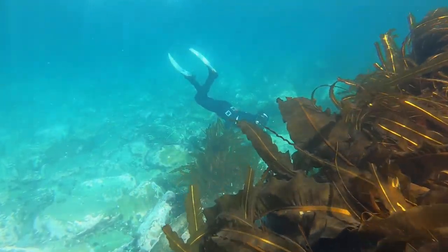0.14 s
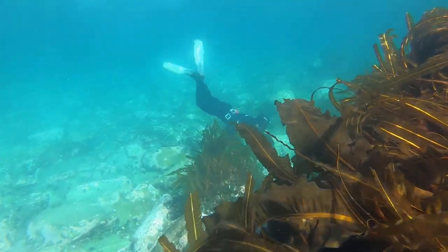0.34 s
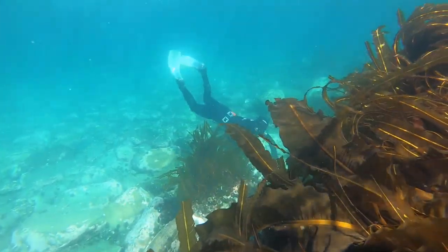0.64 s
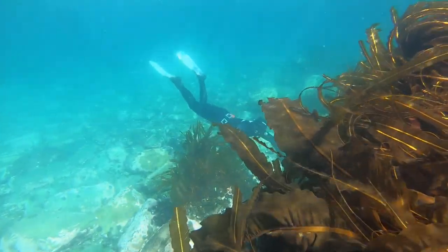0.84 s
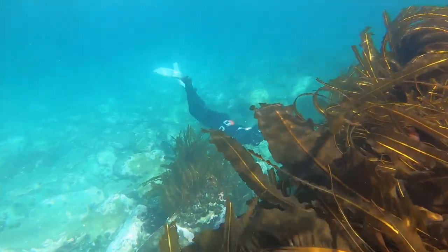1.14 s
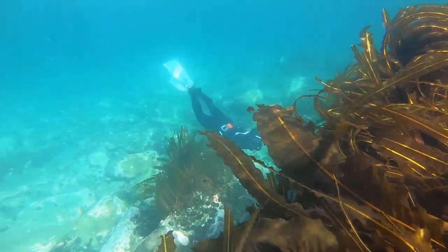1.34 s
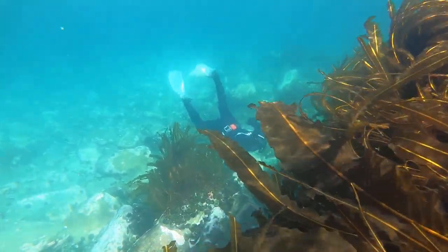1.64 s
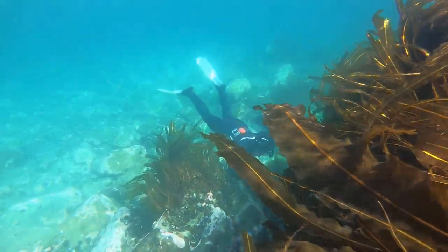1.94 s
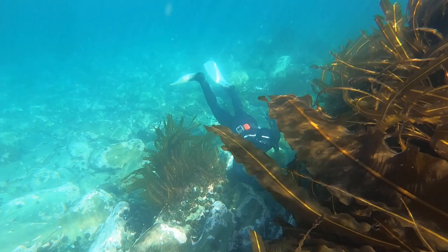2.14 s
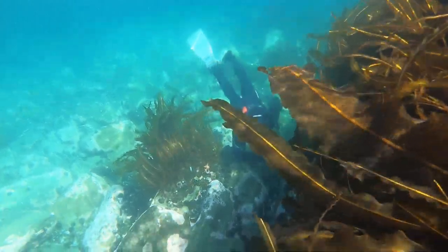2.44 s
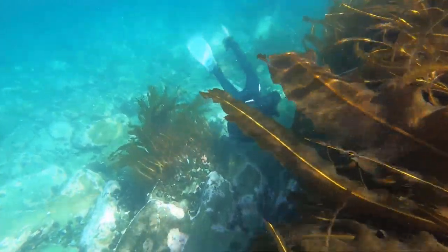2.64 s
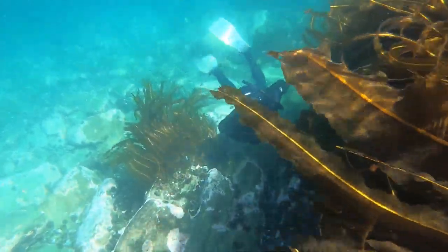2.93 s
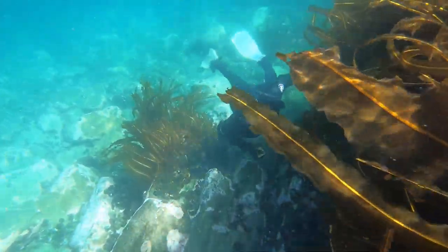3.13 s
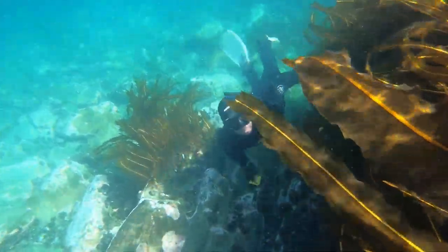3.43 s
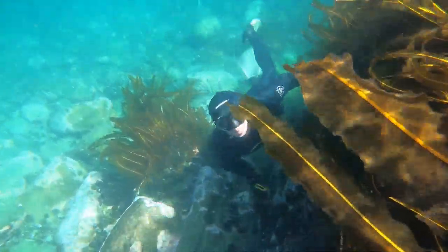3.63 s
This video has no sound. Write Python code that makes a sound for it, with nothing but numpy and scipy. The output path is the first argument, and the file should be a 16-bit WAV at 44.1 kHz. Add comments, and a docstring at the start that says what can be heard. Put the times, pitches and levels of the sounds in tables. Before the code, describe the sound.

Muffled underwater gurgling, heard close through a camera's sealed housing. A quiet rumble, hum and faint hiss open; from 0.2 s hollow bubble blips, thumps and gurgles cluster until about 0.6 s. It thins around 1 s, stirs again at 1.3 s, and a dull slosh with plops comes at 2.1 s. After a sparser stretch near 2.7 s, blips thicken from 3 s, busiest at 3.6 s to the end; tiny ticks throughout.

```python
"""First comes a quiet rumble and hum with a faint far hiss and gurgle; thumps and bright blips soon follow.
We are with a camera in a waterproof housing, under water near rocks. Surges push on it as low waves.
Sloshes are bursts of shaped noise, and the gurgle is many random bubble grains over a wash of noise.
Blips and held notes are single tones, placed by the housing's cavities; blips, gurgle and sloshes also
ring those cavities. Ticks are short high cycles, and rumble, hum and hiss are filtered noise."""
import sys
import numpy as np
from scipy import signal
from scipy.fft import rfft, irfft, next_fast_len
from scipy.io import wavfile
from scipy.ndimage import map_coordinates

SR = 44100
rng = np.random.default_rng(int(sys.argv[2]) if len(sys.argv) > 2 else 0)


def store_pcm(level_fs):
    """Save levels as 16-bit WAV."""
    pcm = np.round(np.clip(level_fs, -1, 1) * 32767).astype(np.int16)
    wavfile.write(sys.argv[1], SR, np.atleast_2d(pcm).T)


def decibels_to_gain(level_db):
    """Convert a level in decibels to a linear amplitude gain (20 dB per decade)."""
    exponent = np.asarray(level_db, float) / 20
    return 10 ** exponent


N = 166698  # length in samples

# Far hiss, relative colour: [f/Hz, level/dB]
SEA_COLOUR = [(120, -14), (200, 0.5), (350, -13.5), (556, -21), (1100, -18.5), (2000, -18.5), (3700, -28),
              (5200, -23), (7300, -21), (8800, -35.5), (10500, -39.5), (12500, -41.5), (14500, -47),
              (16000, -91)]
# Slow swell of the hiss below the split: [t/s, level/dB over the steady hiss]
SEA_SWELL = [(0, 0), (.7, 0.5), (1.35, 3), (1.7, -0.5), (2.8, -0.5), (3.78, -0.5)]
SEA_DB, SEA_SPLIT_HZ = -64, 9700
HUM_HZ, HUM_WIDTH_HZ, HUM_DB = 173.6, 40.5, -58  # width is for one pass of the resonance
HUM_ALIKE = 0.76  # how alike the sides are, with one turned upside down
# Rumble under the surges, relative colour: [f/Hz, level/dB]
RUMBLE_COLOUR = [(8.8, -34), (18, 1.5), (33, 1), (52, -2), (67, -6.5), (103, -28), (130, -16.5), (170, -64),
                 (290, -120)]
RUMBLE_DB, RUMBLE_SWING_DB = -58, 1
# Cavities of the housing: [f/Hz, width of one pass/Hz, right level/dB, left minus right/dB, left lead/rad]
CAVITIES = [(338, 273, -16.5, -4, 4), (530, 117, -11, -9.5, 4), (720, 134, -2.5, -8.5, 4),
            (890, 185, -20.5, 5.5, 4), (1166, 40, -6.5, -3.5, 3.5), (1320, 124, -11, 5, 2.25),
            (1564, 146, -6.5, -9.5, -2.5), (1765, 91, -18.5, 0.5, 5.5), (1970, 202, -14, -2, 1),
            (2444, 204, -25.5, 2, 1.56), (2662, 387, -23, -5.5, -2.5), (3160, 160, -37.5, 3.5, -2.5),
            (3865, 1180, -39, -6.5, 1.6), (5170, 680, -39.5, 3, -0.1), (6136, 470, -32, -7.5, 0.9),
            (6970, 1560, -41.5, 1, 1.3)]
# Tiny bubbles: [start t/s, relative level/dB, f/Hz]
TICKS = [(0.2259, -48, 5840), (0.2365, -50, 7200), (0.2696, -52.5, 7170), (0.5574, -51, 5740),
         (0.7413, -49, 5760), (0.7836, -51, 7300), (1.169, -50.5, 5720), (1.3581, -46.5, 6000),
         (1.847, -51, 7600), (2.0802, -56.5, 5100), (2.358, -49, 7100), (2.578, -54, 5280),
         (2.656, -59, 5300), (2.8365, -47, 5030), (2.862, -60, 5000), (3.2088, -55.5, 5170),
         (3.225, -50.5, 5600), (3.431, -52.5, 5290), (3.588, -45.5, 5070), (3.607, -50, 5150),
         (3.745, -56.5, 5170)]
TICK_S, TICK_TOP_HZ = 0.0029, 7200  # fade time, and where the muffling sets in
# Pushes of water: [crest t/s, relative level/dB, f/Hz, length/s]
SURGES = [(0.084, -44.5, 37, 0.045), (0.154, -43.5, 44, 0.033), (0.312, -33, 46, 0.031),
          (0.359, -42.5, 90, 0.024), (0.445, -39.5, 41.3, 0.057), (0.511, -48, 42.5, 0.035),
          (1.114, -47.5, 55, 0.025), (1.248, -44, 112, 0.0084), (1.298, -36, 42, 0.03),
          (1.358, -42.5, 35, 0.013), (1.652, -43, 35.6, 0.014), (1.723, -40.5, 48, 0.057),
          (1.866, -44, 36.3, 0.059), (1.993, -39, 29, 0.042), (2.07, -42.5, 47, 0.024),
          (2.132, -43.5, 34.7, 0.054), (2.241, -47, 34, 0.036), (2.314, -40.5, 34, 0.035),
          (2.497, -43, 52.6, 0.04), (2.604, -47, 34, 0.017), (3.066, -52, 29, 0.068),
          (3.279, -47.5, 38, 0.056), (3.417, -38, 43.3, 0.033), (3.525, -43.5, 64, 0.018),
          (3.704, -45.5, 35, 0.049)]
SURGE_PAN_DB, SURGE_LEAD_RAD = -5.5, -0.48  # left compared with right
SURGE_SLAP_DB = -8  # higher tone compared with the push
# Water against the housing: [start t/s, dull body level/dB, bright crunch level/dB, length/s]
SLOSHES = [(0.223, -68, -37, 0.0015), (0.253, -56, -54.5, 0.068), (0.444, -42, -58.5, 0.05),
           (0.536, -89, -56.5, 0.087), (1.241, -61, -60, 0.026), (1.287, -41.5, -58, 0.04),
           (1.496, -57, -76, 0.13), (1.716, -73, -53, 0.016), (2.07, -38.5, -47.5, 0.04),
           (2.142, -54, -59.5, 0.073), (2.364, -58, -52.5, 0.0024), (2.544, -48, -69, 0.043),
           (3.139, -47, -79, 0.067), (3.353, -63, -50.5, 0.018), (3.431, -46.5, -78, 0.06),
           (3.582, -67, -52, 0.0032), (3.628, -48.5, -84, 0.046), (3.719, -66, -53.5, 0.051)]
# Relative colours of the dull body and the bright crunch: [f/Hz, level/dB]
SLOSH_BODY = [(40, -38), (70, -11), (130, -2), (250, -6.5), (450, -11), (700, -18.5), (1200, -69)]
SLOSH_CRUNCH = [(300, -46), (900, -20), (2500, 0.5), (4000, 5.5), (6000, -0.5), (8000, -1.5), (10000, -31)]
# Trapped bubbles that sing on: [start t/s, relative level/dB, first f/Hz, last f/Hz, length/s]
HELD = [(0.445, -33.5, 722, 735, 0.053), (1.505, -42.5, 721, 720, 0.049), (2.241, -44.5, 629, 747, 0.06),
        (2.243, -48.5, 1398, 1320, 0.077)]
# Single blips: [t of the snap/s, relative level/dB, f/Hz, length/s]
BUBBLES = [(0.24, -45, 1620, 0.0053), (0.2278, -31.5, 721, 0.017), (0.238, -28.5, 1573, 0.009),
           (0.2387, -24, 723.6, 0.013), (0.277, -37, 1584, 0.013), (0.302, -34.5, 720.0, 0.01),
           (0.345, -41, 1956, 0.0072), (0.417, -38.5, 730.6, 0.056), (0.421, -39, 1604, 0.011),
           (0.44, -40, 1400, 0.01), (0.549, -38.5, 1615, 0.026), (0.552, -36.5, 720.0, 0.022),
           (0.566, -35, 1510, 0.0083), (0.714, -41.5, 1612, 0.029), (0.734, -49.5, 1786, 0.013),
           (0.776, -45, 1274, 0.019), (0.776, -48.5, 2410, 0.0059), (0.854, -45, 1690, 0.01),
           (0.871, -49, 1250, 0.0066), (0.863, -47.5, 741, 0.017), (1.085, -44, 806, 0.021),
           (1.133, -42.5, 1953, 0.021), (1.142, -41, 500, 0.011), (1.3, -28, 770, 0.0077),
           (1.316, -35.5, 1347, 0.011), (1.436, -37.5, 1623, 0.028), (1.472, -37.5, 1494, 0.018),
           (1.558, -48, 1995, 0.011), (1.57, -37.5, 501, 0.016), (1.625, -46.5, 500, 0.025),
           (1.688, -41, 1400, 0.026), (1.719, -33.5, 1560, 0.0068), (1.984, -43, 3420, 0.0037),
           (1.985, -42.5, 1320, 0.015), (2.049, -37, 703, 0.036), (2.077, -38, 1572, 0.014),
           (2.08, -33.5, 1362, 0.0077), (2.079, -25.5, 775, 0.012), (2.08, -44, 2630, 0.016),
           (2.088, -35, 530.0, 0.045), (2.117, -31, 553, 0.0036), (2.12, -27, 693, 0.012),
           (2.142, -27, 716, 0.02), (2.241, -29.5, 710, 0.0042), (2.282, -47, 760, 0.01),
           (2.328, -42, 1353, 0.019), (2.358, -29.5, 1705, 0.0052), (2.375, -49.5, 1230, 0.011),
           (2.424, -45, 2367, 0.004), (2.478, -45, 2090, 0.0057), (2.656, -39.5, 2200, 0.0034),
           (2.674, -49, 2390, 0.0039), (2.683, -54.5, 3530, 0.0062), (2.712, -54.5, 2460, 0.0099),
           (2.789, -53, 2750, 0.005), (2.829, -49.5, 893, 0.0078), (2.857, -34.5, 2576, 0.0075),
           (2.854, -51.5, 964, 0.02), (2.976, -32, 786, 0.009), (3.04, -31, 724, 0.0065),
           (3.087, -29, 730, 0.0035), (3.098, -37, 720.0, 0.0036), (3.162, -33.5, 697, 0.021),
           (3.165, -41, 1116, 0.025), (3.188, -30, 668, 0.01), (3.2, -45, 524, 0.028),
           (3.235, -42, 2480, 0.0043), (3.275, -36, 694, 0.0048), (3.308, -40.0, 660, 0.016),
           (3.36, -35, 767, 0.0081), (3.363, -32.5, 1327, 0.019), (3.365, -28.5, 1500.0, 0.0083),
           (3.39, -37, 1297, 0.016), (3.394, -44, 1583, 0.058), (3.414, -38.5, 683, 0.024),
           (3.446, -33, 707, 0.017), (3.484, -38.5, 1670, 0.01), (3.504, -33, 746, 0.0099),
           (3.508, -32.5, 1123, 0.0057), (3.591, -27, 1274, 0.019), (3.622, -32.5, 784, 0.0072),
           (3.623, -26, 1124, 0.018), (3.626, -43.5, 1866, 0.022), (3.701, -41, 1240, 0.008),
           (3.729, -50.5, 3230, 0.0048), (3.743, -32, 1986, 0.011), (3.744, -28.5, 1165, 0.0063),
           (3.745, -25, 1332, 0.013)]
BUBBLE_RISE, BUBBLE_ROUGH = 0.023, 0.26  # pitch climbs half this share per length; unsteadiness
BUBBLE_SNAP_DB = 12  # blow on the housing, over the blip's table level
# Strength of the gurgle, before its overall lift: [t/s, level/dB]
GURGLE = [(0, -62), (0.21, -64.5), (.23, -53.5), (.33, -54.5), (.39, -56), (0.451, -49.5), (.53, -51.5),
          (.58, -48), (.65, -72), (0.719, -58), (.8, -53), (.84, -69), (.87, -59), (.92, -64.5),
          (1.06, -59.5), (1.22, -57), (1.3, -50), (1.4, -53.5), (1.539, -52.5), (1.6, -63), (1.72, -55),
          (1.8, -58.5), (2.029, -68), (2.08, -48), (2.2, -60), (2.36, -61.5), (2.45, -60), (2.6, -57.5),
          (2.73, -62), (2.77, -73), (2.95, -73.5), (2.978, -58), (3.17, -53.5), (3.37, -53.5), (3.52, -54),
          (3.57, -64.5), (3.602, -48.5), (3.67, -62.5), (3.74, -52), (3.78, -46.5)]
# Weight of the large, deep bubbles: [t/s, gain below the split/dB]
DEEP = [(0, -0.5), (.45, -8.5), (.75, -17), (1.1, -6), (1.38, -12), (1.52, 5), (1.75, -12.5), (2.05, 6.5),
        (2.3, 5), (2.42, -9.5), (2.9, 7), (3.05, -1), (3.5, 1), (3.62, -5), (3.78, 1)]
# Lowest and highest bubble pitch in the gurgle: [f/Hz, f/Hz]
GURGLE_RANGE = (350, 8500)
GURGLE_DB, GURGLE_PER_S, GURGLE_SPREAD_DB, GURGLE_CYCLES = 4.5, 800, 3, 8.9
WASH_DB, DEEP_HZ = -1.5, 1090  # wash compared with the bubbles; deep split


def unit(x):
    """Scale to an rms of 1."""
    return x / np.sqrt(np.mean(x ** 2) + 1e-20)


def wobble(rate):
    """Draw a smooth random curve with this many knots a second."""
    return map_coordinates(rng.standard_normal(int(N * rate / SR) + 4), [np.arange(N) * rate / SR])


def over_time(points):
    """Join [t/s, level/dB] points by straight lines."""
    return np.interp(np.arange(N) / SR, *np.transpose(points))


def filtered(x, response):
    """Multiply the spectrum of x by a response that depends on frequency."""
    m = next_fast_len(N + SR // 2)  # spare room lets the ringing die
    return irfft(rfft(x, m) * response(np.fft.rfftfreq(m, 1 / SR)), m)[..., :N]


def colour(points):
    """Turn [f/Hz, level/dB] points into a gain for every frequency."""
    f, v = np.transpose(points)
    return lambda hz: decibels_to_gain(np.interp(np.log(hz + 1), np.log(f + 1), v))


def peak(f, hz, width_hz):
    """Response of one resonance, which rings only after it is struck."""
    return 1j * f * width_hz / (hz * hz - f * f + 1j * f * width_hz)


def housing(f):
    """Left and right response of the cavities: a sum of resonances, each passed twice."""
    total = 0
    for hz, width_hz, db, pan_db, lead in CAVITIES:
        left_and_right = np.array([[decibels_to_gain(pan_db) * np.exp(1j * lead)], [1]])
        total = total + decibels_to_gain(db) * peak(f, hz, width_hz) ** 2 * left_and_right
    return total


def sides(x, gains):
    """Give a complex signal its level and phase on each side."""
    return np.real(np.reshape(gains, (2, 1)) * x)


def placed(hz):
    """Side gains of the cavities at one pitch, the louder side set to 1."""
    gains = housing(np.array([hz]))
    return gains / abs(gains).max()


def surge_gains():
    """Level and phase of a push on each side: the left is softer and later."""
    return [decibels_to_gain(SURGE_PAN_DB / 2) * np.exp(1j * SURGE_LEAD_RAD), decibels_to_gain(-SURGE_PAN_DB / 2)]


def add(out, s, x):
    """Mix x in at s seconds, or at the very start if s is negative."""
    k = max(round(s * SR), 0)
    out[:, k:k + x.shape[1]] += x


def sea():
    """Far hiss: separate noise on each side; its lower part swells, the top stays steady."""
    hiss = unit(filtered(rng.standard_normal((2, N)), colour(SEA_COLOUR))) * decibels_to_gain(SEA_DB)
    fizz = filtered(hiss, lambda f: 1 / (1 + (f / SEA_SPLIT_HZ) ** 16))
    swell = decibels_to_gain(over_time(SEA_SWELL) + 1.02 * wobble(8.55))
    return hiss + fizz * (swell - 1)


def hum():
    """Far water: a narrow low band of noise that mostly pushes one side while it pulls the other."""
    opposed, shared = filtered(rng.standard_normal((2, N)), lambda f: peak(f, HUM_HZ, HUM_WIDTH_HZ) ** 2)
    turn = np.arccos(np.clip(HUM_ALIKE, 0, 1)) / 2
    shared, opposed = np.sin(turn) * shared, np.cos(turn) * opposed
    return unit(np.array([shared + opposed, shared - opposed])) * decibels_to_gain(HUM_DB + 1.63 * wobble(3.1))


def rumble():
    """Swaying low noise, leaning to one side as the surges do, with a little opposite noise."""
    noise = unit(filtered(rng.standard_normal((2, N)), colour(RUMBLE_COLOUR)))
    bed, loose = noise * decibels_to_gain(RUMBLE_DB + RUMBLE_SWING_DB * wobble(12))
    return sides(signal.hilbert(bed), surge_gains()) + 0.13 * loose * [[1], [-1]]


def ticks():
    """Tiny bubbles: a few high cycles with a crackle, muffled by the housing wall."""
    out, t = np.zeros((2, N + SR)), np.arange(900) / SR
    shape = np.exp(-t / TICK_S) * (1 - np.exp(-t / 0.00055))
    for s, db, hz in TICKS:
        ring = sides(np.exp(2j * np.pi * hz * t), [np.exp(.7j), 1])
        crackle = 2.3 * rng.standard_normal((2, 900)) * np.exp(-t / 0.0021)
        add(out, s, decibels_to_gain(db + 3.5) * (ring + crackle) * shape)
    # the second factor takes away the lows
    return filtered(out[:, :N], lambda f: 1 / (1 + (f / TICK_TOP_HZ) ** 12) / (1 + (4200 / (f + 1)) ** 8))


def surges():
    """Low pushes: short bell-shaped waves, each with a higher slap that opposes the two sides."""
    out = np.zeros((2, N + SR))
    for (s, db, hz, length), u in zip(SURGES, rng.random((len(SURGES), 3))):
        half = int(2 * length * SR)
        t = np.arange(-half, half) / SR
        bell = decibels_to_gain(db) * np.exp(-2.6 * (t / length) ** 2)
        push = np.exp(2j * np.pi * (hz * t + u[0]))
        slap_hz = (1.8 + 1.5 * u[1]) * hz
        slap = decibels_to_gain(SURGE_SLAP_DB) * np.exp(2j * np.pi * (slap_hz * t + u[2]))
        add(out, s + t[0], sides(bell * push, surge_gains()) + sides(bell * slap, [-.6, 1]))
    return out[:, :N]


def sloshes():
    """Lumpy noise bursts: a dull body, partly opposite on the sides, and a crunch that rings the cavities."""
    t, body, crunch = np.arange(N) / SR, np.zeros(N), np.zeros(N)
    for s, body_db, crunch_db, length in SLOSHES:
        u = np.clip(t - s, 0, None) / max(length, .002)
        swell = (1 - np.exp(-u * 14)) / (1 + u ** 3.17)
        body += decibels_to_gain(body_db) * swell
        crunch += decibels_to_gain(crunch_db) * swell
    low = unit(filtered(rng.standard_normal((2, N)), colour(SLOSH_BODY)))
    low = np.array([-.5 * low[0] + 0.36 * low[1], low[0]]) * body * decibels_to_gain(1.6 * wobble(40))
    grit = filtered(rng.standard_normal(N) * decibels_to_gain(0.88 * wobble(330)), colour(SLOSH_CRUNCH))
    return low + filtered(grit * crunch, housing) / np.std(filtered(grit, housing))


def held():
    """Trapped bubbles: a slightly wavering tone that glides and stops short."""
    out = np.zeros((2, N + SR))
    for s, db, first_hz, last_hz, length in HELD:
        t = np.arange(int(length * SR)) / SR
        hz = first_hz + (last_hz - first_hz) * t / length
        edges = np.clip(np.minimum(t, length - t) / 0.003, 0, 1)  # 3 ms in and out
        shape = edges * decibels_to_gain(2.4 * wobble(72)[:len(t)])
        tone = np.exp(2j * np.pi * np.cumsum(hz) / SR)
        add(out, s, sides(decibels_to_gain(db) * shape * tone, placed(last_hz)))
    return out[:, :N]


def bubbles():
    """Each blip swells fast, wavers and dies; the cavities place it and ring from its first snap."""
    out, blows = np.zeros((2, N + SR)), np.zeros(N)
    for (s, db, hz, length), z in zip(BUBBLES, rng.standard_normal((len(BUBBLES), 40))):
        length = max(length, .003)
        t = np.arange(int(5 * length * SR)) / SR
        waver = np.interp(t / 0.00398, np.arange(20), z[:20]) + 1j * np.interp(t / 0.00382, np.arange(20), z[20:])
        swell = 1 - np.exp(-t * hz / 1.24)
        decay = (1 - t / t[-1]) / (1 + (t / length) ** 0.79) * np.exp(-.4 * t / length)
        cycles = hz * t * (1 + BUBBLE_RISE * (t / length - 1) / 4)
        tone = np.exp(2j * np.pi * cycles + 1j * z[0]) * (1 + BUBBLE_ROUGH * waver)
        add(out, s - .001, sides(decibels_to_gain(db + 2.0) * swell * decay * tone, placed(hz)))
        blows[round(s * SR)] += decibels_to_gain(db + BUBBLE_SNAP_DB) * z[1]  # random strength and sign
    return out[:, :N] + filtered(blows, housing)


def gurgle():
    """Random small bubbles over a wash of turbulence, all heard through the cavities."""
    count = int(GURGLE_PER_S * N / SR)
    u, t = rng.random((count, 4)), np.arange(1100) / SR
    low_hz, high_hz = GURGLE_RANGE
    hz = low_hz * (high_hz / low_hz) ** u[:, 1:2]
    life = t * hz / GURGLE_CYCLES  # higher bubbles die sooner
    size = decibels_to_gain(-GURGLE_SPREAD_DB * np.log(u[:, 2:3] + 0.18)) * hz / 1000
    grains = size * life * np.exp(-3.5 * life) * np.sin(2 * np.pi * (hz * t + u[:, 3:]))
    at = (u[:, :1] * N).astype(int) + np.arange(len(t))
    grain_sum = np.bincount(at.ravel(), grains.ravel())[:N]
    drive = unit(grain_sum) + decibels_to_gain(WASH_DB) * rng.standard_normal(N)
    deep = filtered(drive, lambda f: 1 / (1 + (f / DEEP_HZ) ** 8))
    drive += deep * (decibels_to_gain(over_time(DEEP)) - 1)
    envelope = decibels_to_gain(over_time(GURGLE) + GURGLE_DB + 1.82 * wobble(18))
    return filtered(drive * envelope, housing) / np.std(filtered(drive, housing))


def scene():
    """Add all the sources and close with a fade of about 3 ms."""
    fade = np.clip(np.arange(N)[::-1] / 130, 0, 1)
    background = sea() + hum() + rumble()
    water = ticks() + surges() + sloshes()
    return fade * (background + water + held() + bubbles() + gurgle())


def low_pass(x):
    """Removes everything above the highest recorded frequency."""
    return signal.sosfilt(signal.butter(12, 14800, fs=SR, output="sos"), x)


def record(dry):
    """Turn the finished mix into the sound that is kept."""
    return low_pass(dry)


dry = scene()
out = record(dry)
store_pcm(out)
```